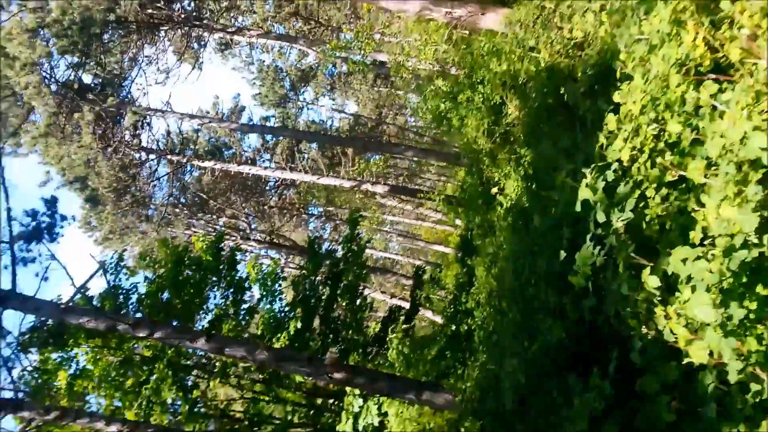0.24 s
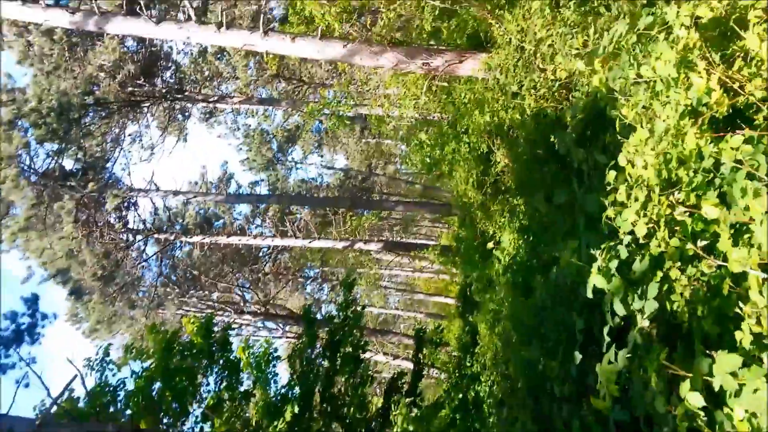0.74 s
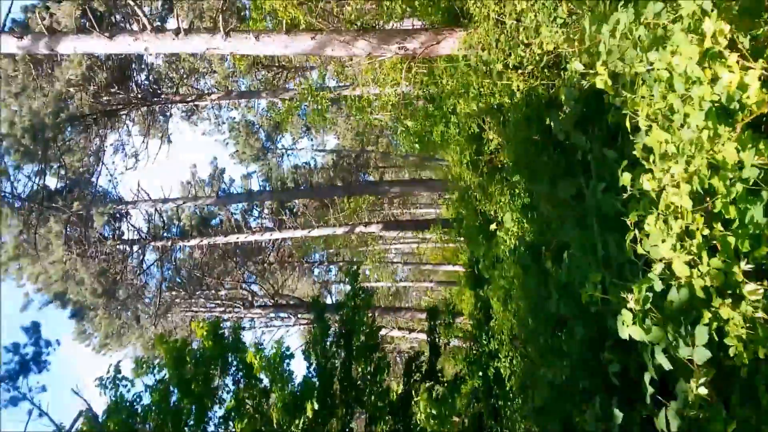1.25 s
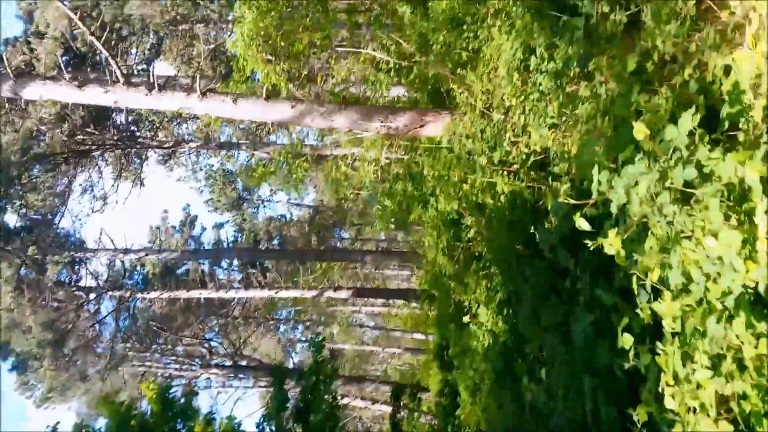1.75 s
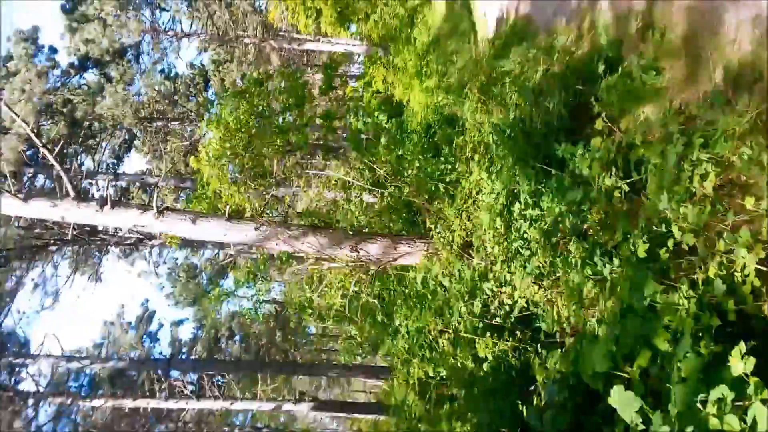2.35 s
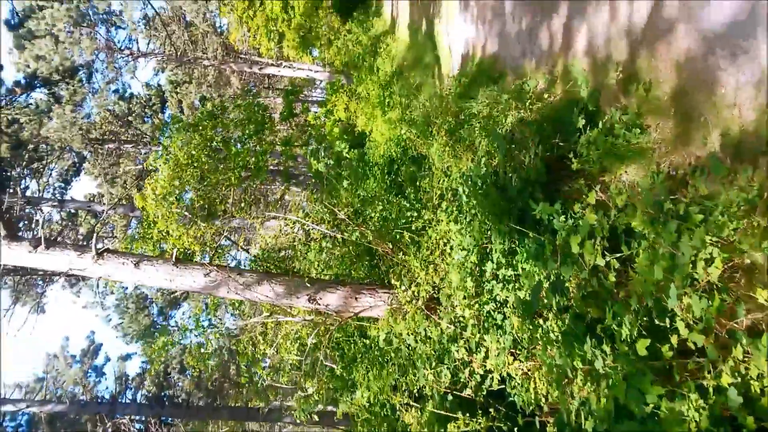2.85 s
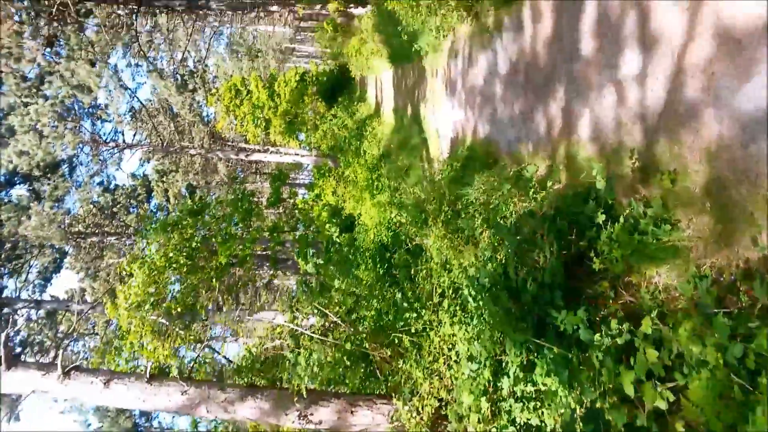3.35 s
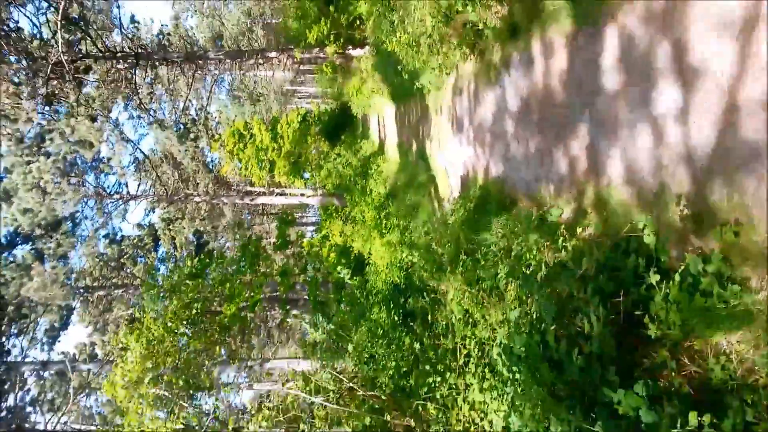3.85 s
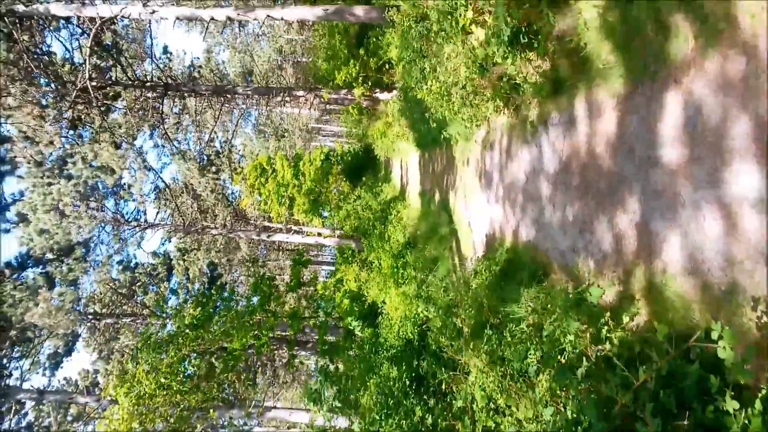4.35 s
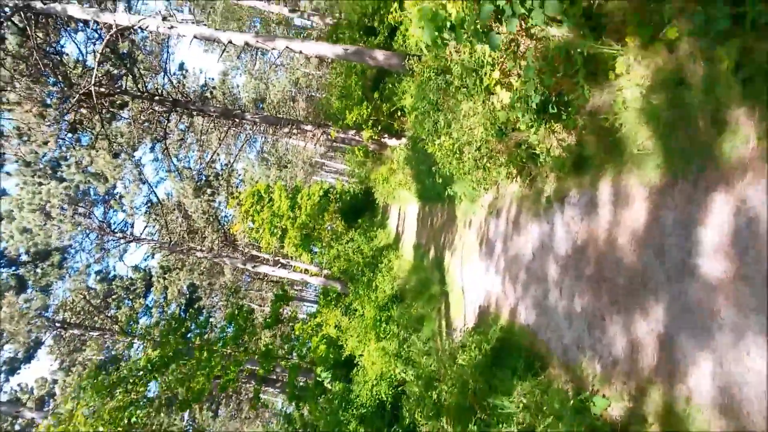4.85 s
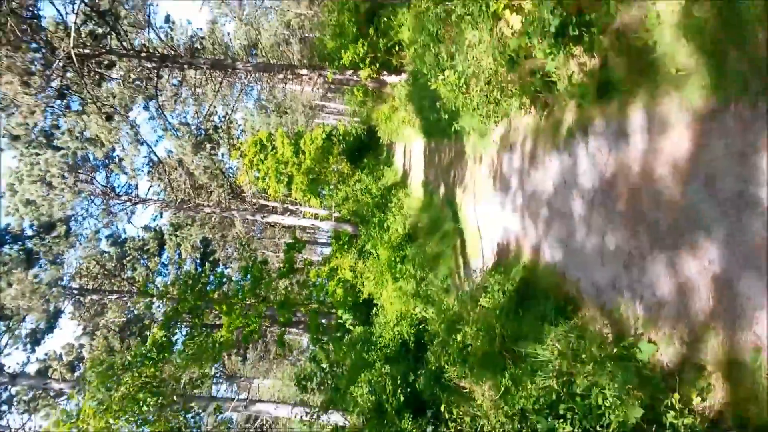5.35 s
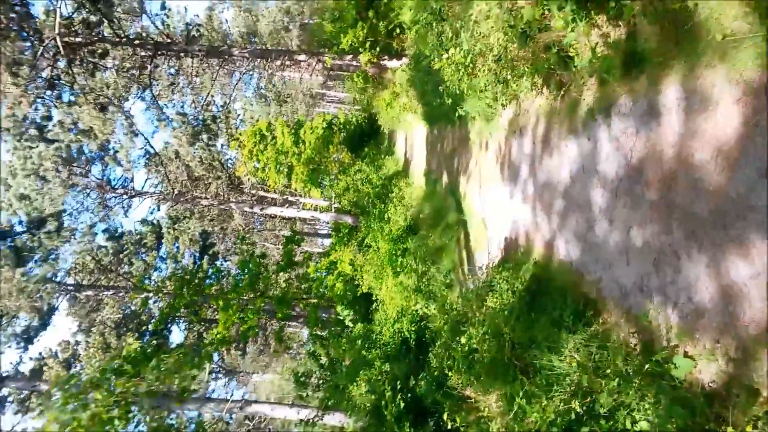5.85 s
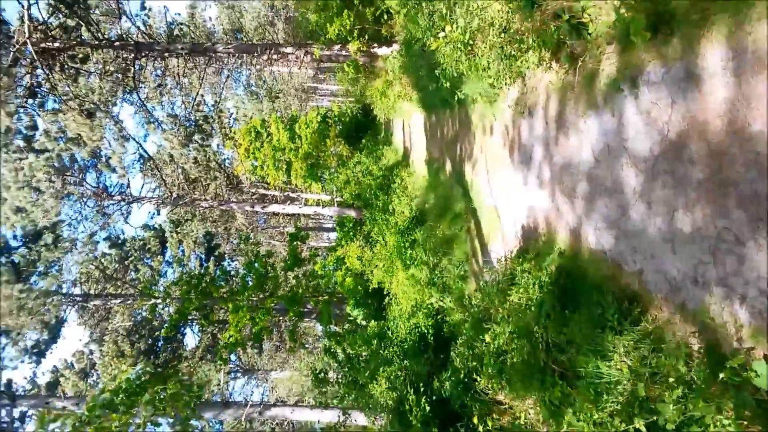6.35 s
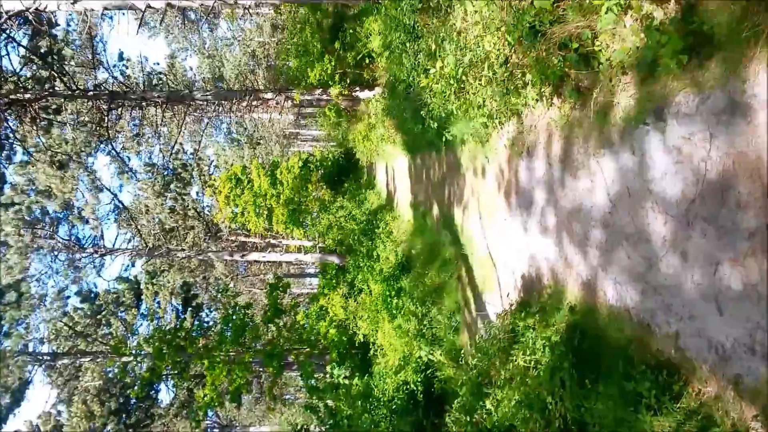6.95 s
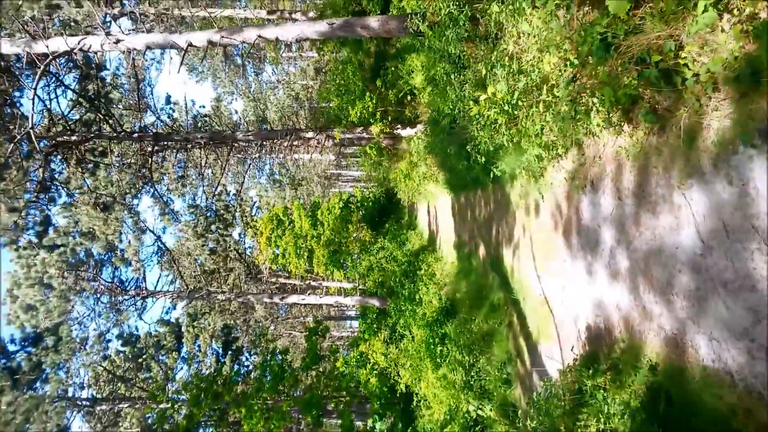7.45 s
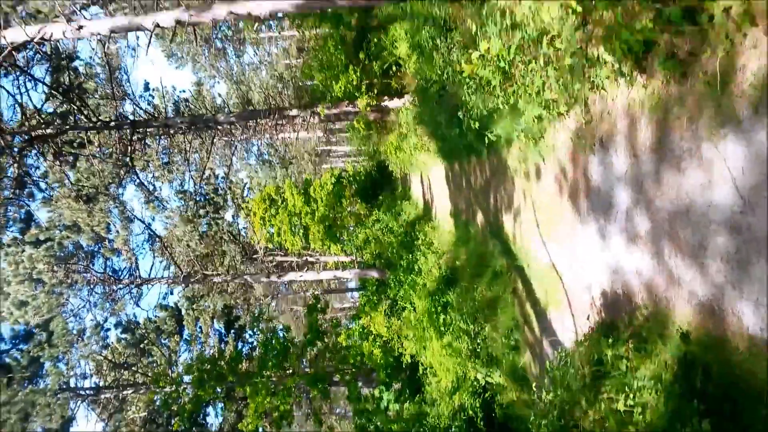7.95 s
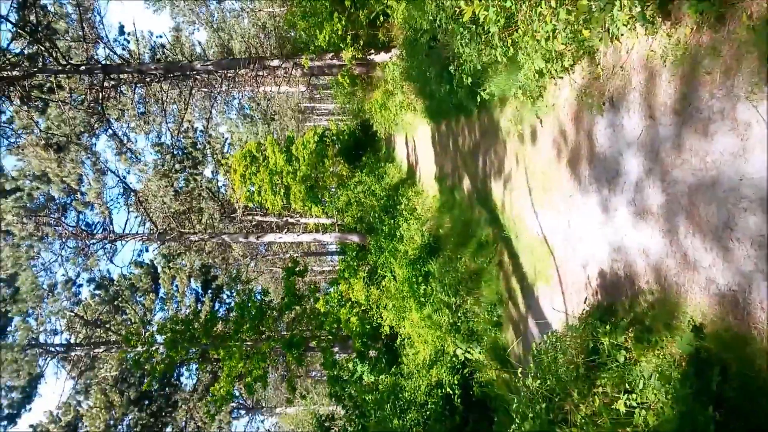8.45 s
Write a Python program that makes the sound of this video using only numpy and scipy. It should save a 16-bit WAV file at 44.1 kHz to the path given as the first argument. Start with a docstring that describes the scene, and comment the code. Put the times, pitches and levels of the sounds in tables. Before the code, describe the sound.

Songbirds whistle, chirp and buzz in an echoing pine wood over soft airy hiss, with handling rumbles, faint sandy scuffs and a few sharp knocks.

```python
"""A pine wood with a sandy path, where someone walks holding a phone and songbirds call.
Left, an open port: birds as gliding sines and buzzes of noise, tree echoes as random taps, airy noise,
scuffs and ticks underfoot as ringing grains and snaps. Right, a port under the hand: its hiss, the grip
rumbling as a crowd of small knocks, and a faint trace of the echoes. Knocks on the case sound in either port."""
import sys
import numpy as np
from scipy import signal
from scipy.io import wavfile
from scipy.ndimage import uniform_filter1d

SR = 44100
rng = np.random.default_rng(int(sys.argv[2]) if len(sys.argv) > 2 else 0)


def store_pcm(level_fs):
    """Save levels as 16-bit WAV."""
    pcm = np.round(np.clip(level_fs, -1, 1) * 32767).astype(np.int16)
    wavfile.write(sys.argv[1], SR, np.atleast_2d(pcm).T)


N = 384111  # length in samples


def gain_of(db):
    """Decibels to amplitude."""
    return 10 ** (np.asarray(db) / 20)


def evened(x):
    """Scales to rms 1."""
    return x / np.sqrt(np.mean(x ** 2) + 1e-20)


def add(mix, s, sound):
    """Mixes a sound in at time s, cut off at the end of the mix."""
    part = mix[round(s * SR):][:len(sound)]
    part += sound[:len(part)]


def resonate(x, hz, width):
    """A resonance of gain 1: shift its pitch down to zero, smooth, shift back."""
    turn = np.exp(2j * np.pi * hz * np.arange(len(x)) / SR)
    r = np.exp(-np.pi * width / SR)
    smooth = signal.lfilter([1 - r], [1, -r], x / turn)
    return 2 * (turn * smooth).real


# Slow swell of the hiss, shared by both ports. Each row: time in seconds, treble level in dB.
HISS_SWELL = [(0, -72), (.6, -69), (.98, -73), (1.2, -68), (1.42, -70.5), (1.98, -73.5), (2.28, -76),
              (2.55, -70.5), (3.06, -77), (3.2, -71.5), (3.45, -73.5), (3.65, -78.5), (4.2, -74.5),
              (4.48, -80), (4.7, -73.5), (5.15, -76), (5.3, -71), (5.87, -76), (6.15, -71.5), (6.85, -71),
              (7.4, -76), (7.6, -75), (7.9, -77.5), (8.4, -75.5), (8.55, -80.5), (8.71, -77)]
USUAL_DB = -72.5  # the swell level at which the noise spectra hold


def swell(t):
    """How far the hiss stands over its usual level, in dB."""
    return np.interp(t, *np.transpose(HISS_SWELL)) - USUAL_DB


# The hand shifting on the case. Each row: start in seconds, length in seconds, rumble level in dB.
HAND_SHIFTS = [(0, 0.29, -43), (0.393, 0.23, -45.5), (0.694, 0.24, -53.5), (1.01, 0.22, -37),
               (1.572, 0.27, -41.5), (2.35, 0.19, -46.5), (2.729, 0.16, -48), (3.203, 0.14, -52),
               (3.845, 0.16, -45), (4.237, .14, -53.5), (4.545, 1.067, -42), (5.71, 0.13, -46.5),
               (5.913, 0.27, -47), (6.458, .5, -46.5), (7.035, .17, -43.5), (7.962, 0.16, -47.5),
               (8.323, .1, -55)]
# a quiet hand rumbles softly, following the hiss (dB per dB); shifts have soft edges
STILL_DB, STILL_FOLLOW, SHIFT_EDGE_S = -54, 1.1, 0.061


def effort_db(t):
    """Rumble level of the quiet hand, and the lift by the shifts, which rise, hold and fall."""
    still_db = STILL_DB + STILL_FOLLOW * swell(t)
    power = 0
    for s, length, db in HAND_SHIFTS:
        to_edge_s = np.minimum(t - s, s + length - t)
        power = power + gain_of(2 * db) * np.clip(to_edge_s / SHIFT_EDGE_S + .5, 0, 1) ** 2
    lift_db = 10 * np.log10(1 + power / gain_of(2 * still_db))
    return still_db, lift_db


RUSTLE = 0.14  # dB of extra hiss per dB of rumble lift, before each port takes its share


def hiss_db(t):
    """The hiss swells slowly and rustles up when the hand shifts."""
    return swell(t) + RUSTLE * effort_db(t)[1]


def noise(spectrum, level_db, patchy_db=.8, flicker_db=.9):
    """Random short-time spectra with drifting patches and a quick flicker shared by all pitches."""
    t = np.arange(N // 128 + 5) * 128 / SR
    hz = np.fft.rfftfreq(512, 1 / SR)
    a, b, patches = rng.standard_normal((len(t), 257, 3)).T
    patches = evened(uniform_filter1d(uniform_filter1d(patches, 6, 0), 20, 1))
    flicker = evened(uniform_filter1d(rng.standard_normal(len(t)), 6))
    f, db = np.transpose(spectrum)
    colour_db = np.interp(np.log(hz + 1), np.log(f), db)[:, None]
    total_db = colour_db + level_db(t) + patchy_db * patches + flicker_db * flicker
    return signal.istft((a + 1j * b) * gain_of(total_db), nperseg=512, noverlap=384)[1][:N]


# Colour of the open port at its usual level. Each row: frequency in Hz, level in dB per bin.
OPEN_AIR = [(30, -66.5), (100, -71), (250, -68), (500, -72), (1000, -77), (2000, -80.5), (4000, -79.5),
            (6000, -80.5), (7500, -72.5), (8500, -77.5), (10000, -83), (14500, -86.5)]


def air():
    """Noise of the open port, following the hiss level almost fully."""
    return noise(OPEN_AIR, lambda t: 0.99 * hiss_db(t))


# Colour of the covered port at its usual level. Each row: frequency in Hz, level in dB per bin.
COVERED_HISS = [(30, -53), (100, -74), (300, -83), (600, -82), (1500, -87.5), (4000, -88), (14500, -89)]


def covered_hiss():
    """Noise of the covered port, following the hiss level a little less."""
    return noise(COVERED_HISS, lambda t: 0.84 * hiss_db(t))


def knock(size, spread=6.2, crest_s=0.00396, peak_s=0.0062, tail=0.25, tick=0.093):
    """A bending wave in the case: the treble arrives first, so the pitch falls as 1 / time."""
    t = np.arange(1, round(0.088 * size * SR)) / SR / size  # size stretches the whole knock
    blow = np.exp(-(np.log(t / peak_s) / 0.45) ** 2)
    after = tail * (t / 0.012) * np.exp(1 - t / 0.011)
    first = tick * np.exp(-((t - .002) / 0.00047) ** 2)
    falling_wave = np.cos(spread * np.log(t / crest_s))
    return (first + blow + after) * falling_wave * np.cos(np.pi / 2 * t / .07)


def grip():
    """The palm slips on the case: many small knocks of four sizes, dulled by the skin."""
    happens = rng.random((4, N)) < 36 / SR  # 36 slips a second of each size on average
    slips = happens * rng.choice([-1., 1.], (4, N)) * gain_of(4.06 * rng.standard_normal((4, N)))
    rumble = np.zeros(N)
    for x, size, db in zip(slips, (.9, 1.5, 2.4, 3.6), (-4.5, -3.0, 0.0, 0)):
        rumble += signal.oaconvolve(x, knock(size))[:N] * gain_of(db)
    rumble = signal.sosfilt(signal.butter(4, 330, fs=SR, output="sos"), rumble)
    return evened(rumble) * gain_of(sum(effort_db(np.arange(N) / SR)))


def whistle(hz, db, rough):
    """A sine on a pitch curve; moving leaves on the way make it flutter."""
    drift = rng.standard_normal((2, len(hz) + 400))
    drift = uniform_filter1d(uniform_filter1d(drift, 200), 200)
    a, b = drift[:, 200:-200] * np.sqrt(150)
    shape = np.sin(np.pi * np.linspace(0, 1, len(hz)) ** 0.46) ** 0.15 * gain_of(db)
    shape = shape * np.minimum(np.arange(len(hz)) / (0.057 * len(hz)), 1)  # a soft start
    flutter = np.sqrt(1 - rough ** 2) + rough * (a + 1j * b)
    tone = np.exp(2j * np.pi * np.cumsum(hz) / SR) * flutter
    return np.sqrt(2) * shape * tone.real


# Loose syllables of the far warbler, a flick to one pitch and a slide to another.
# Each row: start in seconds, top of the flick in Hz, end of the slide in Hz, level in dB.
LOOSE_WARBLES = [(.001, 4530, 3580, -59), (1.016, 3340, 2326, -53), (1.22, 3300, 2180, -54.5),
                 (1.485, 3065, 2224, -61.5), (1.591, 3100, 2224, -62.5), (7.34, 4890, 3370, -68),
                 (7.5, 4310, 4500, -71), (7.67, 4480, 4400, -68), (8.02, 4450, 4240, -66),
                 (8.345, 2150, 1700, -71)]
# its even run of six: the end pitch sinks RUN_SINK_HZ a syllable, the top half as much
RUN_S, RUN_GAP_S, RUN_TOP_HZ, RUN_END_HZ, RUN_SINK_HZ = .095, .1566, 4280, 3636, 107.4
RUN_DB, RUN_SHY_DB = -53, -5.5  # the first syllable is softer by the shy amount
# seconds of start, top, slide end and stop: the run holds its last pitch longer
RUN_SHAPE_S, LOOSE_SHAPE_S = (0, .014, .047, .09), (0, .014, .055, .07)


def warbler():
    """One syllable, sung again and again at other pitches; the run starts shyly."""
    out = np.zeros(N)
    run = []
    for k in range(6):
        top_hz = RUN_TOP_HZ - RUN_SINK_HZ * k / 2
        end_hz = RUN_END_HZ - RUN_SINK_HZ * k
        run.append((RUN_S + k * RUN_GAP_S, top_hz, end_hz, RUN_DB + RUN_SHY_DB / 3 ** k))
    for rows, shape in ((run, RUN_SHAPE_S), (LOOSE_WARBLES, LOOSE_SHAPE_S)):
        for s, top_hz, end_hz, db in rows:
            turns_hz = (.8 * top_hz, top_hz, end_hz, .97 * end_hz)
            hz = np.interp(np.arange(0, shape[-1], 1 / SR), shape, turns_hz)
            add(out, s, whistle(hz, db, rough=0.92))
    return out


# Knocks on the case. Each row: start in seconds, level in dB, size as a factor on the ring time,
# port (0 left, 1 right).
CASE_KNOCKS = [(.1345, -9, 1.08, 1), (.1612, -12, 1.07, 1), (.475, -48.5, 1.24, 0), (1.142, -29, 0.55, 0),
               (1.746, -31.5, 1.15, 1), (5.2, -40, 1.63, 0), (2.818, -34.5, 1.3, 1), (3.273, -35, 1.46, 1),
               (4.536, -36.5, 1.5, 1), (4.693, -31, 1.16, 1), (5, -35, 1.1, 1), (5.215, -39, 1.14, 0),
               (5.288, -29, 1.58, 1), (5.709, -36, 1.45, 1), (5.95, -31, 1.62, 1), (7.133, -13.5, 1.07, 1),
               (7.142, -21.5, 0.98, 1), (8.294, -49.5, 1.6, 0)]


def knocks():
    """Blows on the case, each heard in one port only; the harder the blow, the stronger its tick."""
    out = np.zeros((2, N))
    for s, db, size, port in CASE_KNOCKS:
        blow = knock(size, tick=0.12 * gain_of(db + 16))
        add(out[round(port)], s, gain_of(db) * blow)
    return out


def along(length):
    """A 0-1 ramp over a note, with 4 ms to spare for its fades."""
    return np.linspace(0, 1, round((length + .004) * SR))


# Level whistles. Each row: start in seconds, length in seconds, pitch in Hz, level in dB.
HELD_NOTES = [(0.153, 0.081, 6900, -68), (0.372, .1, 8000, -60.5), (.365, 0.033, 4520, -56),
              (.407, 0.065, 4820, -53.5), (0.678, .031, 4490, -56), (1.001, 0.081, 3900, -52.5),
              (1.2, 0.092, 3700, -51.5), (1.304, .16, 4270, -60), (1.444, .32, 3140, -54),
              (1.447, 0.063, 4330, -52.5), (1.589, .095, 4290, -60.5), (1.828, 0.045, 4890, -51),
              (2.152, 0.053, 3450, -63), (2.388, .016, 2830, -58), (2.512, 0.013, 2655, -52.5),
              (2.66, 0.01, 3270, -46.5), (2.813, 0.0082, 3170, -52), (3.082, 0.011, 3236, -59.5),
              (3.119, .03, 5370, -59), (3.408, 0.021, 3094, -51.5), (4.001, 0.018, 7430, -54.5),
              (5.252, .035, 4350, -59.5), (5.69, 0.035, 3550, -67), (5.916, 0.13, 4070, -54.5),
              (6.261, 0.057, 2466, -47), (6.31, 0.025, 2880, -50), (6.448, 0.011, 3160, -43),
              (6.459, 0.22, 3720, -60), (6.734, 0.026, 7250, -52), (6.833, 0.049, 2893, -50.5),
              (6.922, 0.028, 2973, -45), (7.325, 0.037, 5910, -62), (7.595, .11, 5860, -62.5),
              (8.037, 0.078, 2840, -64.5), (8.157, 0.17, 2440, -71), (8.342, .06, 7740, -69),
              (8.421, 0.041, 4460, -68)]
# Straight glides. Each row: start in seconds, length in seconds, start Hz, end Hz, level in dB.
GLIDE_NOTES = [(.391, 0.026, 7450, 2950, -47), (1.125, 0.011, 6500, 3980, -56),
               (1.135, .053, 3920, 4230, -52.5), (6.62, .03, 2900, 3250, -57),
               (1.802, .15, 8225, 7820, -45.5), (2.128, .02, 5500, 3400, -60),
               (2.216, 0.013, 3760, 5700, -54), (2.335, .011, 3930, 5600, -55),
               (2.447, 0.016, 7500, 4300, -50.5), (3.104, 0.011, 4960, 6300, -52),
               (3.143, 0.013, 5500, 4420, -47), (3.203, 0.013, 4250, 5700, -50),
               (3.221, .026, 5700, 6330, -49.5), (3.247, .008, 6400, 4290, -45),
               (5.699, .029, 7160, 6770, -41), (5.72, 0.0091, 6830, 2020, -49),
               (5.913, 0.022, 4690, 5170, -51), (6.056, 0.04, 2790, 2900, -54),
               (6.115, 0.014, 3440, 3115, -44), (6.65, 0.1, 3306, 3192, -42),
               (7.96, 0.1, 2540, 2876, -65.5), (7.73, .03, 4300, 3180, -69),
               (8.085, 0.035, 4300, 3220, -66), (8.378, .0092, 7360, 4270, -59),
               (8.589, 0.13, 2840, 3000, -63)]
# Chirps of a sinking phrase. Each row: start in seconds, start Hz, end Hz, level in dB.
FALLING_CHIRPS = [(2.229, 4430, 2700, -47.5), (2.345, 4110, 3050, -46.5), (2.463, 4130, 3060, -46),
                  (2.571, 4420, 2910, -48), (2.722, 3624, 2720, -47), (2.867, 3580, 2570, -54),
                  (2.941, 3100, 2260, -55), (3.019, 2980, 2220, -57.5), (3.427, 4050, 3120, -48.5)]
FALL_HZ_PER_S = 50000  # all chirps fall at one speed
# Whistles with a strong octave. Each row: start in seconds, length in seconds, start Hz, end Hz,
# level of the lower tone in dB.
OCTAVE_NOTES = [(3.117, 0.031, 3840, 3680, -57.5), (3.205, .054, 3800, 3970, -56),
                (3.306, .02, 3850, 4280, -53.5)]
OCTAVE_DB = 2  # octave over the lower tone


def straight_notes():
    """Notes whose pitch holds or moves in a line, as (s, pitch curve Hz, level dB)."""
    rows = GLIDE_NOTES + OCTAVE_NOTES
    rows = rows + [(s, n, hz, hz, db) for s, n, hz, db in HELD_NOTES]
    rows += [(s, n, 2 * a, 2 * b, db + OCTAVE_DB) for s, n, a, b, db in OCTAVE_NOTES]
    rows += [(s, (a - b) / FALL_HZ_PER_S, a, b, db) for s, a, b, db in FALLING_CHIRPS]
    return [(s, a + (b - a) * along(n), db) for s, n, a, b, db in rows]


# Hooks, a quick drop onto a level whistle. Each row: start in seconds, length in seconds,
# start Hz, settled Hz, level in dB.
HOOK_NOTES = [(.205, .05, 5300, 4700, -58.5), (0.524, 0.043, 4680, 4450, -55.5),
              (0.837, 0.031, 4780, 4350, -50), (.763, .057, 7400, 5870, -56),
              (1.431, 0.078, 7100, 4790, -54), (1.555, 0.027, 4870, 4300, -50.5),
              (1.943, .066, 8600, 7970, -47.5), (2.073, .056, 8300, 5800, -52.5),
              (5.493, .025, 2690, 2393, -50.5), (5.599, .035, 2780, 2300, -57),
              (6.402, 0.048, 4290, 3780, -47.5), (6.501, 0.045, 3890, 3380, -47.5),
              (7.492, 0.056, 3240, 2930, -65.5), (8.31, 0.059, 3180, 2955, -59.5)]
SETTLE_S = .008  # time constant of the drop


def hook_notes():
    """Notes whose pitch settles exponentially, as (s, pitch curve Hz, level dB)."""
    return [(s, b + (a - b) * np.exp(-along(n) * n / SETTLE_S), db) for s, n, a, b, db in HOOK_NOTES]


# Arches, up to a top and down again. Each row: start in seconds, length in seconds, foot Hz, top Hz,
# place of the top from 0 to 1, level in dB.
ARCH_NOTES = [(1.713, 0.037, 3800, 5970, 0.35, -47.5), (1.792, 0.038, 3960, 5910, 0.31, -45),
              (1.898, .016, 3680, 5150, .3, -45.5), (3.084, 0.027, 5100, 6500, 0.3, -60),
              (3.31, .039, 5030, 6300, .5, -47.5), (3.324, 0.016, 3370, 4400, .4, -50.5),
              (5.085, .04, 1920, 3400, 0.38, -64.5), (5.48, .014, 2300, 3090, 0.5, -58),
              (2.716, 0.0123, 3600, 5000, .5, -58)]


def arch_notes():
    """Notes on a parabola bent to put its top early or late, as (s, pitch curve Hz, level dB)."""
    notes = []
    for s, n, foot_hz, top_hz, place, db in ARCH_NOTES:
        bent = along(n) ** (np.log(.5) / np.log(np.clip(place, .1, .9)))
        notes.append((s, foot_hz + (top_hz - foot_hz) * 4 * bent * (1 - bent), db))
    return notes


def whistles():
    """The near birds' whistled notes, each a fluttering sine on its pitch curve."""
    out = np.zeros(N)
    for s, hz, db in straight_notes() + hook_notes() + arch_notes():
        add(out, s - .002, whistle(hz, db, rough=0.58))
    return out


def trunks(x, t60, late_db, gap_s=0.0034):
    """Echoes from near boughs, then far trunks: sparse random taps; swaying keeps changing the paths."""
    out = np.zeros(N)
    sway = np.arange(N) / SR * 2 * np.pi * 7  # 7 Hz
    at = np.arange(0, SR // 2 - 40, 40)
    for k in range(3):
        taps = np.zeros(SR // 2)
        here = at + rng.integers(0, 40, len(at))
        boughs = gain_of(-60 * here / SR / 0.032)
        far_trunks = gain_of(late_db - 60 * here / SR / t60)
        taps[here] = rng.choice([-1., 1.], len(at)) * (here > gap_s * SR) * (boughs + far_trunks)
        share = np.sqrt(2 / 3) * np.cos(sway + k * np.pi / 3)
        out += share * signal.oaconvolve(x, taps / np.linalg.norm(taps))[:N]
    return out


# Twigs ticking underfoot. Each row: start in seconds, level in dB.
TWIG_TICKS = [(0.3743, -33), (0.5037, -29), (0.5801, -25), (3.9545, -35)]


def ticks():
    """Twigs underfoot: single bright snaps of two sines that die within milliseconds."""
    out = np.zeros(N)
    t = np.arange(130) / SR
    ring = np.sin(2 * np.pi * 7600 * t) + 0.15 * np.sin(2 * np.pi * 11500 * t)
    for s, db in TWIG_TICKS:
        add(out, s, gain_of(db) * np.exp(-t / 0.00045) * ring)
    return out


# Scuffs of a sole on sand. Each row: start in seconds, length in seconds, level in dB,
# brightness in dB per octave around 2500 Hz.
SAND_SCUFFS = [(1.008, 0.063, -55.5, -1.5), (4.094, 0.024, -57, 11), (4.786, 0.08, -56.5, 14),
               (5.246, 0.033, -56, 3.5), (5.7, 0.091, -56, 15), (5.951, 0.081, -47.5, 0.4),
               (6.833, 0.062, -53.5, 24), (7.28, 0.071, -59.5, 1.5), (7.958, 0.089, -63, 3)]
# Resonances a scuff rings in. Each row: frequency in Hz, width in Hz, level in dB before brightness.
SOLE_RINGS = [(800, 420, 10), (1530, 810, 8.5), (3050, 670, 4), (5230, 990, 4.5), (6410, 310, 9),
              (7670, 1170, 4.5)]


def scuffs():
    """A sole on sand: dense grains of uneven strength ringing in the sole."""
    out = np.zeros(N)
    for s, length, db, bright_db in SAND_SCUFFS:
        u = np.linspace(0, 1, round(length * SR))
        grains = rng.standard_normal(len(u))
        uneven = evened(uniform_filter1d(rng.standard_normal(len(u)), 60))
        grains = grains * gain_of(5.0 * uneven)
        ring = np.zeros(len(u))
        for f, w, d in SOLE_RINGS:
            tilt_db = bright_db * np.log2(f / 2500)
            ring += gain_of(d + tilt_db) * resonate(resonate(grains, f, w), f, w)
        shape = signal.windows.tukey(len(u), .4) * (1.3 - 0.25 * u)
        add(out, s, gain_of(db) * evened(ring) * shape)
    return out


# Buzzy calls. Each row: start in seconds, length in seconds, centre Hz, width Hz, level in dB.
BUZZY_CALLS = [(1.487, 0.11, 7160, 1030, -45.5), (5.49, 0.033, 2320, 300, -55.5),
               (6.4, .035, 2100, 220, -59.5), (4.183, 0.076, 7360, 920, -42.5)]


def buzzes():
    """Noise in the throat: a double resonance under a rounded swell."""
    out = np.zeros(N)
    for s, length, hz, width, db in BUZZY_CALLS:
        u = np.linspace(0, 1, round(length * SR))
        throat = resonate(resonate(rng.standard_normal(len(u)), hz, width), hz, width)
        add(out, s, gain_of(db) * evened(throat) * np.sin(np.pi * u) ** 0.54)
    return out


def scene():
    """Open port left, covered port right."""
    near = whistles() + buzzes()
    far = warbler()
    near_echo = gain_of(-2.0) * trunks(near, t60=0.45, late_db=-13.5)
    far_echo = gain_of(4) * trunks(far, t60=0.94, late_db=3)
    echo = near_echo + far_echo
    left = near + far + echo + air() + scuffs() + ticks()
    right = gain_of(-32) * echo + covered_hiss() + grip()
    return np.array([left, right]) + knocks()


EDGE_HZ = 14550  # upper band edge


def record(dry):
    """The band limit: a steep lowpass on both ports."""
    lowpass = signal.firwin(511, EDGE_HZ, window=("kaiser", 9), fs=SR)
    return signal.oaconvolve(dry, lowpass[None], "same")


dry = scene()
out = record(dry)
store_pcm(out)
```